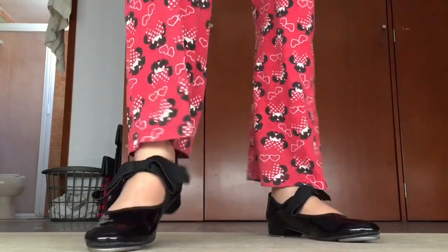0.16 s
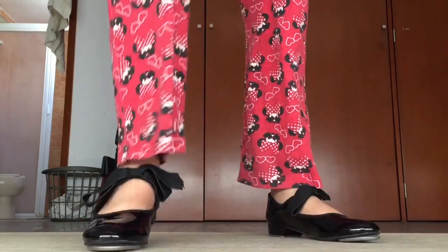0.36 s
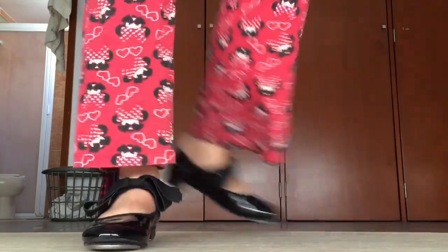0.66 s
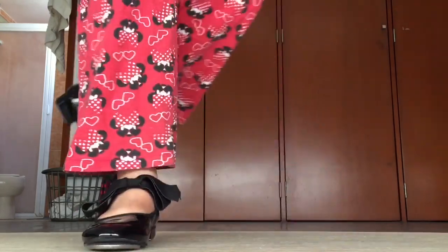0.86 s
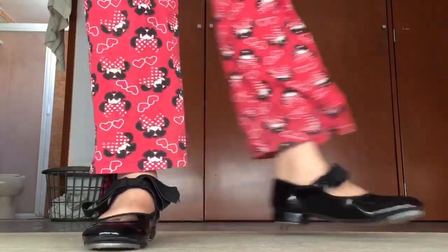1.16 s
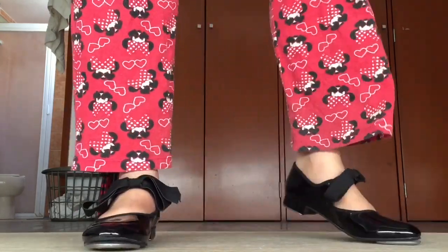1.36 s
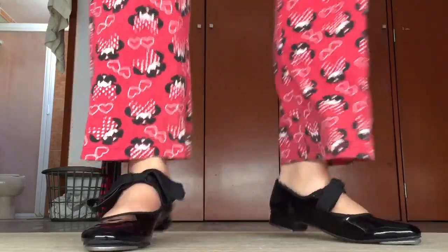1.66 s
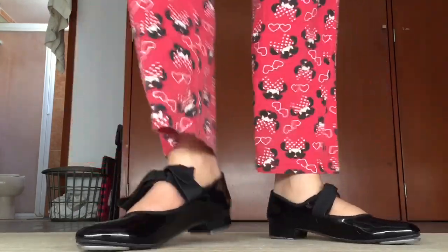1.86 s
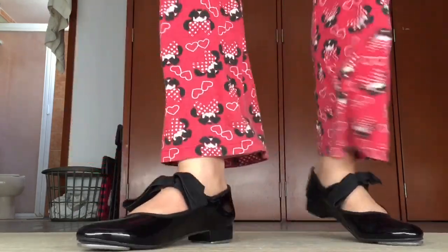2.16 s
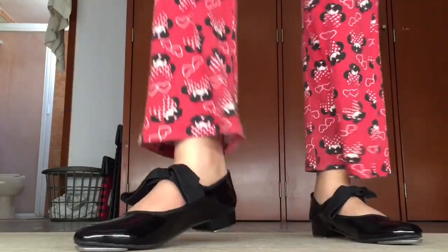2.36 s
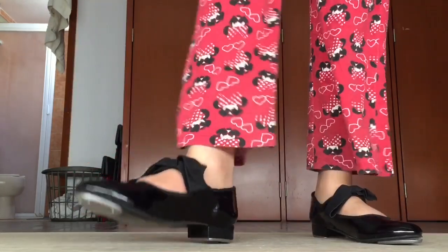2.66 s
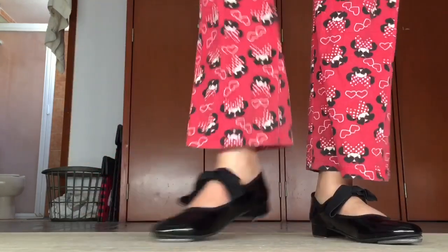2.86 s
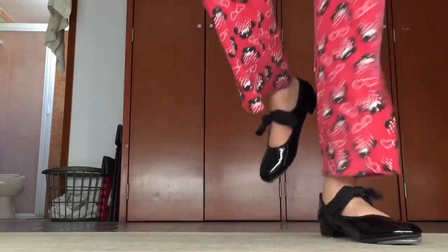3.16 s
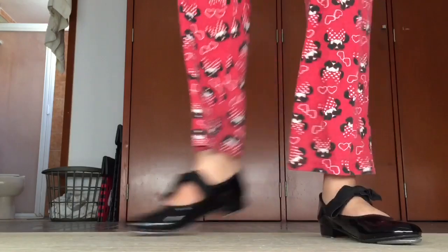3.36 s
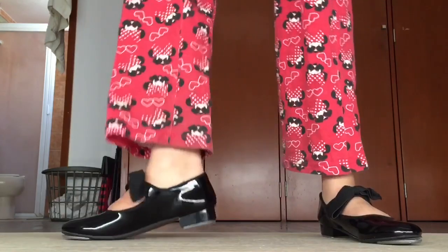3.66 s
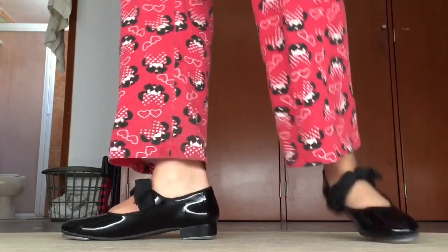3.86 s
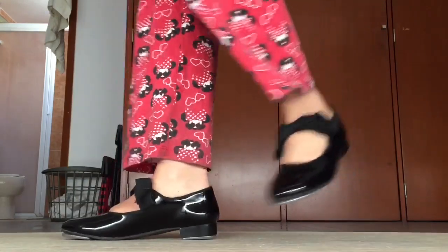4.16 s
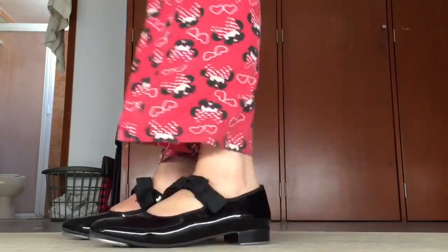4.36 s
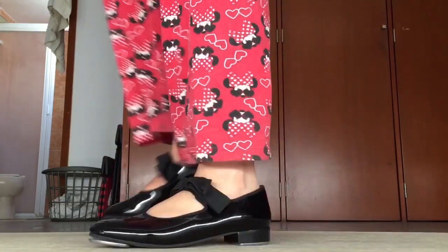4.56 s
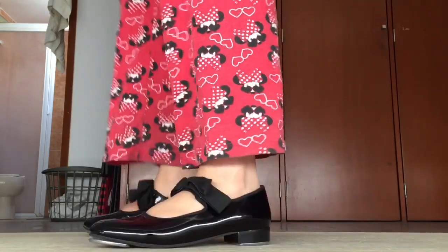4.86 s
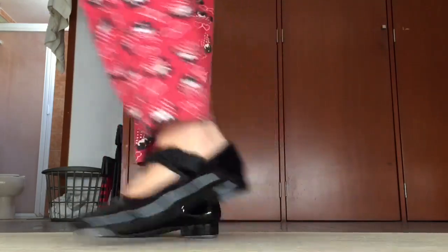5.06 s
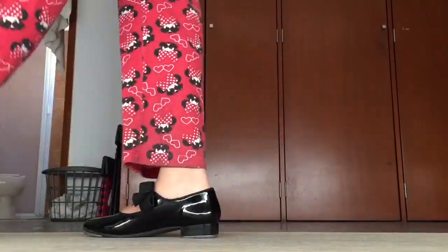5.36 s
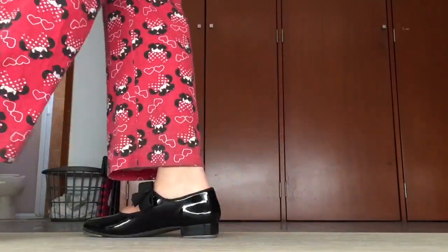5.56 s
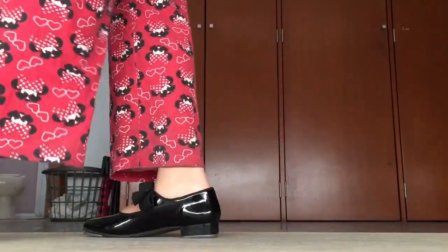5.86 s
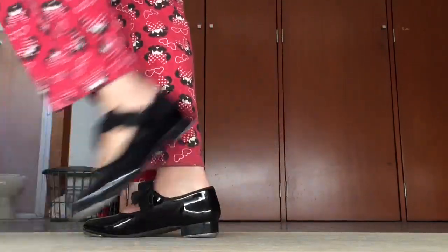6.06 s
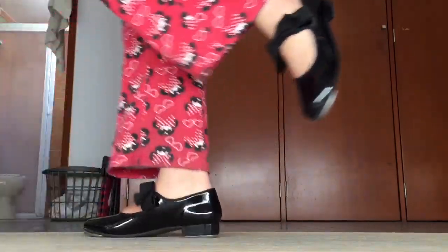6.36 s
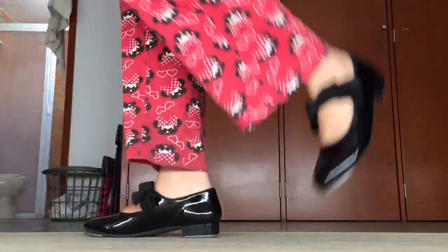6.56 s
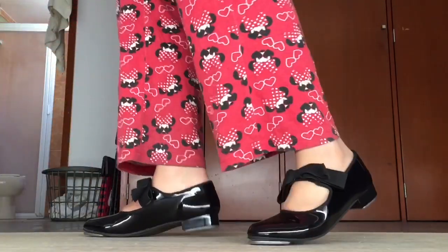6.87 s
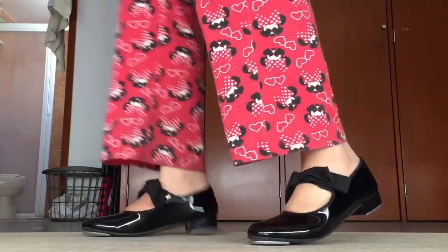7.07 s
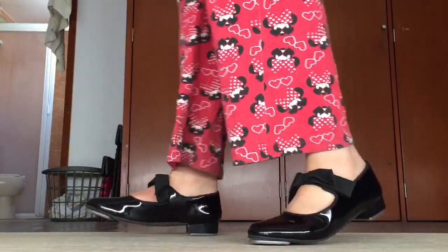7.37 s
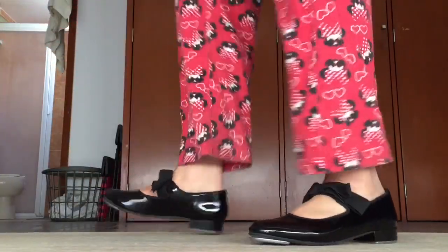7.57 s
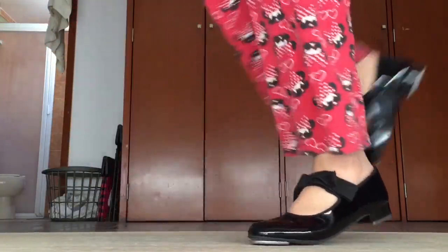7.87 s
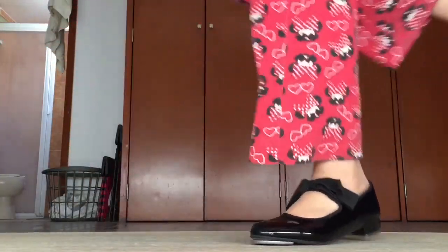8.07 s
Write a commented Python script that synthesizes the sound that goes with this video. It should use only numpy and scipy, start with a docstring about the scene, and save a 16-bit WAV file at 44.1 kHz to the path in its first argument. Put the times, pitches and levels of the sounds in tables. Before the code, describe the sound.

Someone tap dances at an unhurried pace, each crisp metallic clack heard close up with a short room echo.

```python
"""A bare, live room with a hard floor, heard close up from the ground.
A dancer in metal-tipped tap shoes steps, brushes and drops heels.
Each contact is one short blow that rings sole, floor and metal plate for a few milliseconds.
The room answers every blow; dull thuds and a faint steady rush lie underneath."""
import sys
import numpy as np
from scipy import signal
from scipy.fft import rfft, irfft, next_fast_len
from scipy.io import wavfile
from scipy.ndimage import uniform_filter1d, minimum_filter1d, map_coordinates

SR = 44100
rng = np.random.default_rng(int(sys.argv[2]) if len(sys.argv) > 2 else 0)


def dump_mix(stems):
    """Bounce the given channels to the path in sys.argv[1] as a 16-bit WAV at rate SR."""
    frames = np.atleast_2d(stems).T  # one column per channel
    limited = np.clip(frames, -1, 1)  # hard clip at full scale
    pcm = np.round(limited * 32767).astype(np.int16)
    wavfile.write(sys.argv[1], SR, pcm)


N = 362502

# the dancer's taps: start_s, strength_db, click_db, sole_hz, sole_db, zing_db, room_db
TAP_HITS = [(0.1156, 17, 8.5, 890, 4, 4, 2.5), (0.5695, 18.5, -6.0, 1170, 4.0, 3.0, -1),
            (1.141, 7.5, 2, 694, 11.0, 8, 5), (1.3795, 13.5, 9, 640, 8, 5.5, 2.0),
            (1.8543, 11.0, -13, 786, 8, -6, 0.0), (2.0512, 8.0, 7.5, 1184, 9.5, -2.5, -1.5),
            (2.3995, 20.5, -3.5, 710.0, 4, 3.5, -0.5), (2.589, 13.5, -11.5, 403, 4.5, 2.5, -2.5),
            (2.987, 9.5, 11, 1080.0, 4.5, -2.5, -1), (3.2878, 19.5, -6, 830, 3, 6.5, -0.5),
            (3.7125, 12.5, 11, 1720, 4.0, -1.5, 1.5), (3.8883, 3, 1, 880, 6, 6.5, -3.5),
            (4.4672, 20, -11.5, 525, 8.5, 2.5, -2), (4.4752, 8.5, 6, 984, 12, -5, -6),
            (4.4798, 10.5, 12, 640.0, 11.5, 5.5, -1), (4.9918, 11.5, 9.5, 720.0, 6.5, 9.5, 1.5),
            (5.0054, 10.5, -4.0, 1700, 1.5, -2, 3), (5.5989, 19, -7, 1520.0, 4.5, 2.0, -0.5),
            (6.1056, 25, 3.5, 514, 4, 7, -1.5), (6.4836, 14.5, 5.5, 1040.0, 3.5, 3.5, -1.5),
            (6.7859, 20.0, 5.5, 589, 14.5, 4, 0), (7.2372, 18.5, 2.0, 1430.0, 4.5, 0.0, -2.0),
            (7.6323, 18, -8.5, 791, 5, 3.0, 1), (7.8091, 16.5, 10.0, 744, 11, 9.5, 2)]
# light grazes of a foot between the taps: start_s, strength_db, room_db
GRAZE_HITS = [(.539, -13, -1), (2.0186, -7, -2.5), (2.3717, -19.5, 2), (2.889, -18, -6.5),
              (5.1689, -4, -2.5), (5.2214, -3.5, -3), (5.996, -14.5, 7)]
# dull thuds of weight on the floor: start_s, level_db, pitch_hz
FLOOR_THUDS = [(1.152, -50, 90), (4.469, -28, 118.4), (4.996, -30.5, 86), (5.163, -43, 104.5),
               (5.6, -31.5, 58.6), (5.777, -41, 64.6), (7.239, -40, 61)]
# base tone of a shoe striking the floor: frequency_hz, level_db
SHOE_TONE = [(25, -37.5), (70.0, -12.5), (150.0, -4.5), (300.0, -3), (480.0, -6.5), (700.0, -4),
             (1000.0, -1.5), (1500.0, -5.5), (2200.0, -10.5), (3600.0, -17.5), (5000.0, -29.5),
             (6200.0, -36), (8500.0, -49.5), (15000.0, -61)]
# tone of the reverb tail: frequency_hz, gain_db
REVERB_TONE = [(70.0, 7.5), (130.0, 2.5), (180.0, 4.5), (230.0, 4.5), (290.0, 2), (400.0, 2.16), (620.0, 7),
               (950.0, 7.5), (1500.0, 5.5), (3000.0, 2), (6000.0, -1.2), (12000.0, -1.5)]
# length of the reverb tail: frequency_hz, t60_s
REVERB_DECAY = [(70, 0.9), (150, 0.29), (450, 0.54), (900, 0.58), (2000, 0.6), (4200, 0.54), (5100, 0.45),
                (6500, 0.43), (8000, 0.33), (12000, .27)]
# room resonances and one dip: centre_hz, width_hz, gain_db
ROOM_RESONANCES = [(186.6, 5.8, 8), (286.7, 38, 5), (506, 29, 2.5), (630, 63, -4.5), (655, 5.3, 8.5),
                   (957, 81, 2.5)]
# first reflections from cupboard, walls and ceiling: delay_s, gain_db
EARLY_ECHOES = [(.0062, -26.5), (0.0095, -32), (0.0123, -18), (0.015, -27.5), (0.0252, -17), (0.037, -12.5)]
# tone of the background rush: frequency_hz, relative_db
RUSH_TONE = [(15, -28), (25, -11.5), (75, 3.5), (110, -9.5), (322, -5), (378, -12), (614, -14.5),
             (722, -13.5), (1170, -15.5), (1270, -15.5), (3630, -23.5), (6050, -26), (10400, -32),
             (12200, -31.5), (15500, -36)]


def taps(room_tone):
    """Metal-tipped shoes strike the floor; the harder the contact, the higher the plate rings."""
    track = np.zeros(N)
    for start_s, strength_db, click_db, sole_hz, sole_db, zing_db, room_db in TAP_HITS:
        # the body's weight hardly changes, so its thump stands out of soft, dry taps
        thump_db = 12 - 0.65 * strength_db - 0.96 * room_db
        plate_hz = 1670 * 2 ** (click_db / 26)  # an octave up per 26 dB of click
        pulse = blow(strength_db, thump_db, click_db, sole_hz, sole_db, plate_hz,
                     plate_db=2.5, zing_db=zing_db)
        add(track, start_s, shoe_in_room(pulse, room_db, room_tone))
    return track


def blow(strength_db, thump_db, click_db, sole_hz, sole_db, plate_hz, plate_db, zing_db):
    """One hit: weight adds bass, hardness adds treble, the spot struck sets the sole and plate rings."""
    reach_hz = 5000 * amp(strength_db) ** 0.41  # a stronger blow is shorter and reaches higher

    def spectrum_db(hz):
        body = strength_db + along(SHOE_TONE, hz)
        weight = thump_db / (1 + (hz / 400) ** 3)
        treble_shelf = 0.87 / (1 + (2400 / (hz + 1)) ** 3)
        hardness = click_db * (treble_shelf + 0.32 * hump(hz, 8300, 0.15))
        rings = sole_db * hump(hz, sole_hz, 0.33) + plate_db * hump(hz, plate_hz, 0.24)
        # a metal mode with a notch below it
        zing = zing_db * (1.23 * hump(hz, 6000, 0.4) - 0.71 * hump(hz, 4960, 0.1))
        roll_off = -10 * np.log10(1 + (hz / reach_hz) ** 10)
        return body + weight + hardness + rings + plate_modes(hz) + zing + roll_off
    return sole_bending(impulse(spectrum_db))


def plate_modes(hz, depth_db=2.5, spacing_hz=230, lowest_hz=1200):
    """Each spot struck favours some of the plate's upper modes and misses others: a ripple in dB."""
    strengths = rng.standard_normal(256)
    ripple = map_coordinates(strengths, [hz / spacing_hz], mode="mirror")
    return depth_db * ripple * hz ** 2 / (hz ** 2 + lowest_hz ** 2)


def sole_bending(pulse, travel_s=0.00088):
    """Bending waves in the sole: treble arrives first, bass trails (travel_s holds near 1 kHz)."""
    khz = np.fft.rfftfreq(len(pulse), 1 / SR) / 1000
    lag_cycles = 2000 * travel_s * (np.sqrt(khz + 0.1) - np.sqrt(0.1))
    return irfft(rfft(pulse) * np.exp(-2j * np.pi * lag_cycles))


def plate_rattle(pulse, rattle_db=-5, t60_s=0.012, rise_s=0.00072, lowest_hz=900):
    """The screwed-on plate chatters for a few milliseconds, differently at every blow."""
    t = np.arange(SR // 30) / SR
    attack = 1 - np.exp(-(t / rise_s) ** 2)
    chatter = rng.standard_normal(len(t)) * decay(t, t60_s) * attack
    low_cut = signal.butter(2, lowest_hz, "highpass", fs=SR, output="sos")
    chatter = signal.sosfilt(low_cut, chatter / np.linalg.norm(chatter))
    return pulse + amp(rattle_db) * signal.fftconvolve(pulse, chatter)[:len(pulse)]


def beamed_clack(pulse, room_db, beaming=0.28, clack_db=1.0, clack_hz=2300):
    """A shoe that faces the listener beams its clack straight ahead: drier hits get more bite."""
    beam = impulse(lambda hz: (clack_db - beaming * room_db) * hump(hz, clack_hz, 0.89))
    return signal.fftconvolve(pulse, beam)[:len(pulse)]


def shoe_in_room(pulse, room_db, room_tone, direct_db=-0.36):
    """A blow arrives directly, with clack and rattle, and again through the room."""
    direct = amp(direct_db) * plate_rattle(beamed_clack(pulse, room_db))
    reverb = amp(room_db) * signal.fftconvolve(pulse, room_response(room_tone))
    return reverb + np.pad(direct, (0, len(reverb) - len(direct)))


def grazes(room_tone):
    """A foot touches the floor in passing with a soft knock."""
    track = np.zeros(N)
    for start_s, strength_db, room_db in GRAZE_HITS:
        pulse = blow(strength_db, thump_db=10, click_db=-6.5, sole_hz=850, sole_db=6,
                     plate_hz=1550, plate_db=4.5, zing_db=1.5)
        add(track, start_s, shoe_in_room(pulse, room_db, room_tone))
    return track


def floor_thuds(t60_s=0.3, rise_s=0.0037):
    """The floor answers a shift of weight with a low, damped tone."""
    track = np.zeros(N)
    t = np.arange(SR // 2) / SR
    envelope = decay(t, t60_s) * (1 - np.exp(-t / rise_s))
    for start_s, level_db, pitch_hz in FLOOR_THUDS:
        add(track, start_s, amp(level_db) * np.sin(2 * np.pi * pitch_hz * t) * envelope)
    return track


def room_response(room_tone, tail_db=-1.0, build_s=0.0022, path_scatter=0.036):
    """The room's answer from one spot on the floor: a few early echoes, then a diffuse tail."""
    hz, t, noise = signal.stft(rng.standard_normal(SR), SR, nperseg=256)
    t60_s = along(REVERB_DECAY, hz)[:, None]
    unit_energy = np.sqrt(2 * np.log(1000) / (t60_s * SR))
    tail = signal.istft(noise * unit_energy * decay(t, t60_s), SR, nperseg=256)[1][:SR]
    tail *= 1 - np.exp(-(np.arange(SR) / SR / build_s) ** 2)  # echoes need time to pile up
    response = amp(tail_db) * signal.fftconvolve(tail, room_tone)[:SR]
    for delay_s, gain_db in EARLY_ECHOES:
        path_scale = 1 + path_scatter * rng.standard_normal()  # paths change as the feet move about
        response[round(delay_s * path_scale * SR)] += amp(gain_db)
    return response


def room_colour_db(hz):
    """The room's broad colour with its resonances on top."""
    resonances = sum(gain_db / (1 + (2 * (hz - centre_hz) / width_hz) ** 2)
                     for centre_hz, width_hz, gain_db in ROOM_RESONANCES)
    return along(REVERB_TONE, hz) + resonances


def opening_ring(room_tone):
    """The room still rings from a step taken just before the scene opens."""
    track = np.zeros(N)
    pulse = blow(strength_db=14.5, thump_db=4.5, click_db=3.5, sole_hz=900, sole_db=3.5,
                 plate_hz=1860, plate_db=9.5, zing_db=8)
    add(track, -0.1, signal.fftconvolve(pulse, room_response(room_tone)))
    return track


def background_rush(level_db=-66):
    """Steady rush of the room and hiss of the microphone."""
    size = next_fast_len(N + SR // 4)
    tone = amp(along(RUSH_TONE, np.fft.rfftfreq(size, 1 / SR)))
    rush = irfft(rfft(rng.standard_normal(N), size) * tone, size)[:N]
    return amp(level_db) * rush / np.std(rush)


def amp(db):
    """Decibels to gain."""
    return 10 ** (np.asarray(db) / 20)


def decay(t, t60_s):
    """A fade that loses 60 dB every t60_s."""
    return np.exp(-np.log(1000) * t / t60_s)


def along(points, hz):
    """Read a curve of (frequency_hz, value) points on a log axis."""
    point_hz, values = np.transpose(points)
    return np.interp(np.log(hz + 1), np.log(point_hz), values)


def hump(hz, centre_hz, octaves):
    """A resonance peak of height 1 on a log axis."""
    return 1 / (1 + (np.log2((hz + 1) / centre_hz) / octaves) ** 2)


def impulse(spectrum_db, size=4096):
    """The tightest causal pulse with the given spectrum (minimum phase)."""
    gains = amp(spectrum_db(np.fft.rfftfreq(size, 1 / SR)))
    cepstrum = irfft(np.log(gains))
    cepstrum[1:size // 2] *= 2
    cepstrum[size // 2 + 1:] = 0
    return irfft(np.exp(rfft(cepstrum)))


def add(track, start_s, sound):
    """Mix a sound into the track, trimming what falls outside."""
    start = round(start_s * SR)
    part = sound[max(-start, 0):max(N - start, 0)]
    track[max(start, 0):][:len(part)] += part


def scene():
    """The dancer in the room, in mono."""
    room_tone = impulse(room_colour_db, size=8192)
    dancer = taps(room_tone) + grazes(room_tone) + floor_thuds()
    return (dancer + opening_ring(room_tone) + background_rush())[None]


def record(dry):
    """A fast limiter catches the hardest peaks; a steep high cut removes the very top."""
    ceiling, top_hz = 0.86, 15750
    gain = minimum_filter1d(ceiling / np.maximum(np.abs(dry), ceiling), size=129)
    limited = dry * uniform_filter1d(gain, size=129)
    size = next_fast_len(N + SR // 4)
    passband = np.fft.rfftfreq(size, 1 / SR) < top_hz
    return irfft(rfft(limited, size) * passband, size)[:, :N]


dry = scene()
out = record(dry)
dump_mix(out)
```